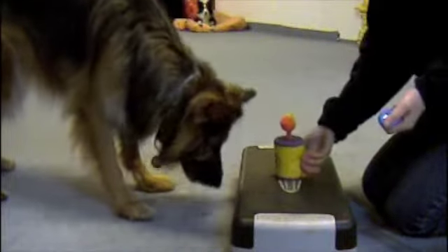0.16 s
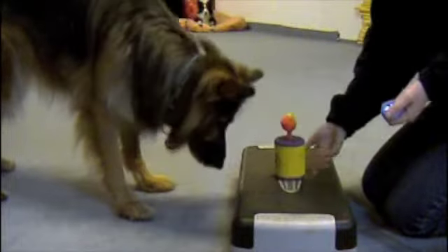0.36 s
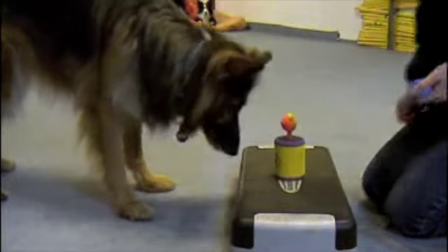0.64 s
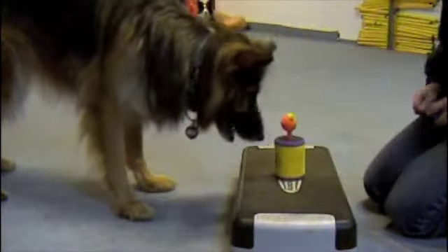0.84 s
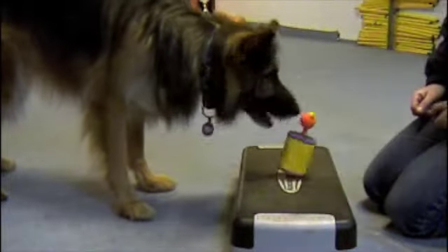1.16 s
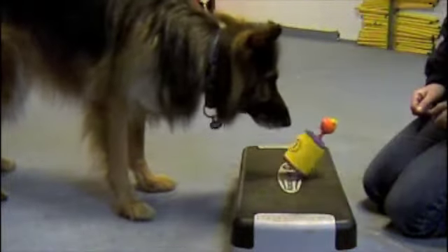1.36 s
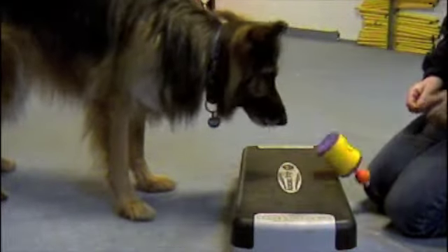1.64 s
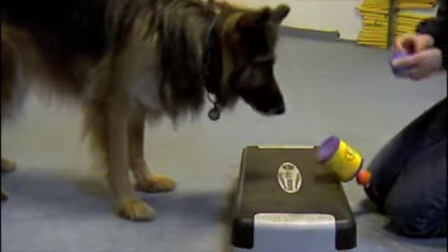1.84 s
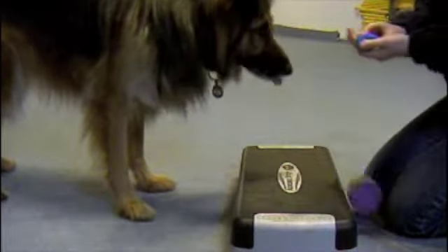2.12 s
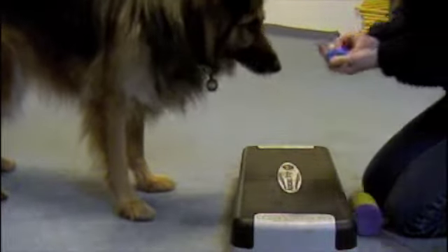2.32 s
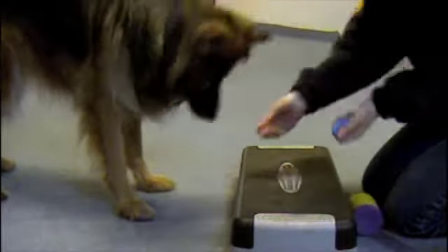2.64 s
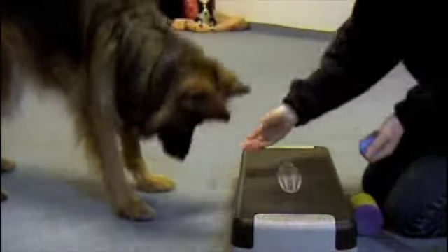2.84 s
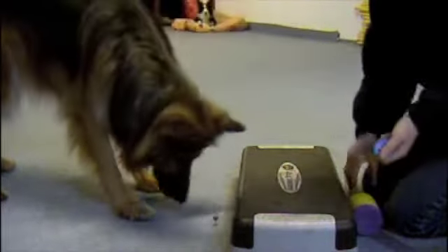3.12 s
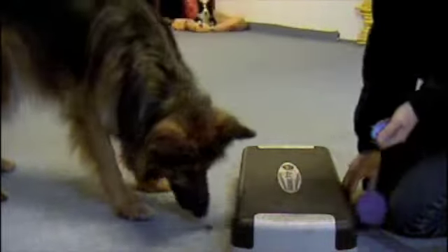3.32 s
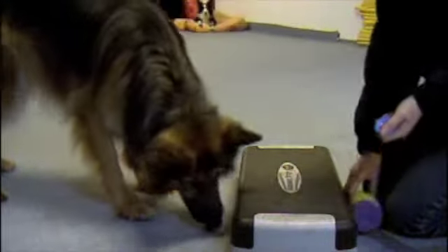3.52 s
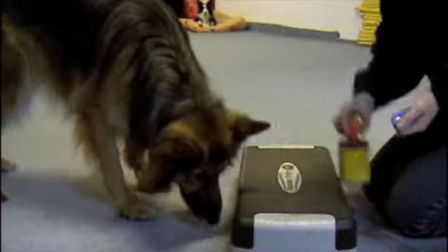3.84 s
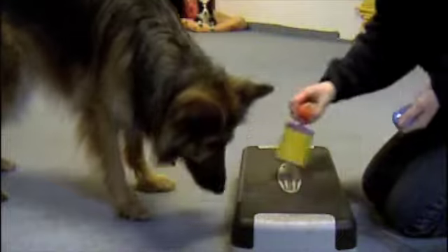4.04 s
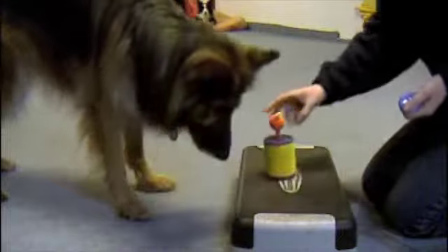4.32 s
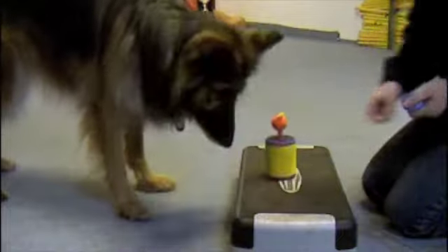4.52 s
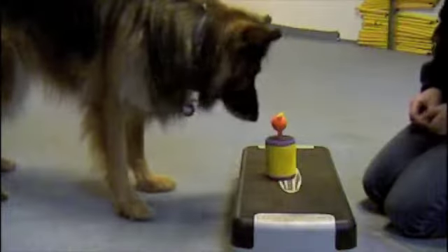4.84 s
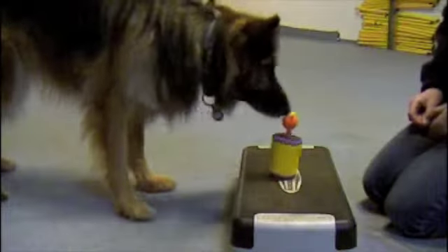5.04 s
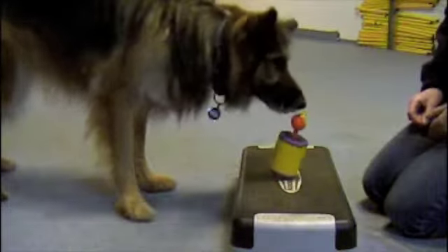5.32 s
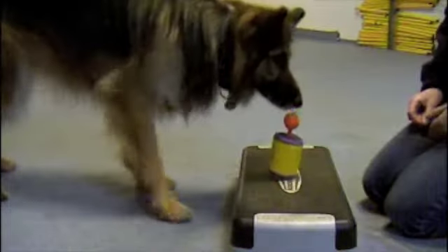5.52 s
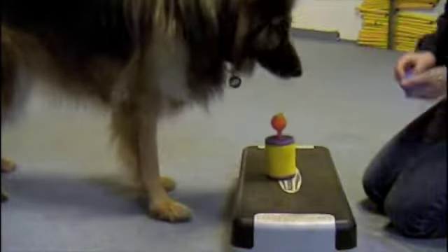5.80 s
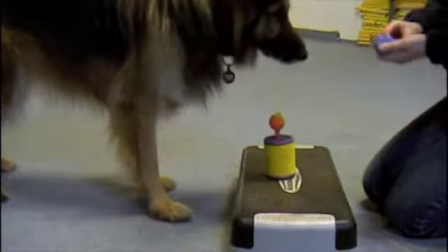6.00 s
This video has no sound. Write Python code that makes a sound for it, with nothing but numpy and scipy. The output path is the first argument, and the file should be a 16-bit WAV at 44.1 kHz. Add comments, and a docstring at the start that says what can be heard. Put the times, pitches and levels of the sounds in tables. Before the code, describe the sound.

A handheld training clicker snaps twice with sharp double clicks in a hall, amid a hollow thud, light plastic clacks and steady hiss.

```python
"""A handheld clicker snaps twice in a bare training hall: its steel tongue buckles, then springs back
at a lower pitch. Each click answers a dog, which nudges a plastic toy off an exercise step and later
touches it again. The hollow step thuds, the toy clacks; paws, hands and collar tick, cloth and fur rub.
A camcorder hisses and whines throughout, and overloads and ducks on every snap."""
import sys
import numpy as np
from scipy import signal
from scipy.fft import rfft, irfft
from scipy.io import wavfile

SR = 44100
rng = np.random.default_rng(int(sys.argv[2]) if len(sys.argv) > 2 else 0)


def inscribe(sig):
    """Save sig as 16-bit PCM at rate SR to the path in sys.argv[1].

    A 1-D sig is mono; a 2-D sig holds one channel per row.
    Samples are clipped to [-1, 1] before scaling.
    """
    pcm = np.round(np.clip(np.atleast_2d(sig).T, -1, 1) * 32767)
    wavfile.write(sys.argv[1], SR, pcm.astype(np.int16))


N = 271682
TIME_S = np.arange(N) / SR

# camcorder hiss spectrum: f/Hz, level/dB
HISS_COLOUR = [(24, -60), (40, -45), (144, -9.5), (269, -7), (297, 0), (337, -6.5), (392, -4), (630, -5),
               (873, -6.5), (965, -7), (2210, -11.5), (5580, -15.5), (6330, -25), (11000, -28),
               (14200, -36), (16000, -57)]
# hiss width: f/Hz, side over mid/dB
HISS_SIDE = [(60, 34.5), (150, 18), (380, 8), (950, 2), (2380, -5), (5980, 3.5), (15000, -4.5)]
# camcorder motor tones: f/Hz, level/dB
MOTOR_TONES = [(899.5, -63), (1500, -68), (1799, -69.5), (4500, -67.5), (4801, -72), (5100, -70.5),
               (5399, -68.5), (5700, -67.5)]
# movements of dog and handler: t/s, length/s, level/dB
MOVES = [(0, 1, -57.5), (0.807, 0.13, -54.5), (1.154, 0.24, -59), (2.15, 0.11, -59.5), (3.48, 0.6, -59.5),
         (4.236, 0.14, -56.5), (4.77, 0.089, -55), (5.578, 0.3, -56)]
# cloth and fur spectrum: f/Hz, level/dB
SHUFFLE_COLOUR = [(60, -9.5), (200, -9.5), (600, 1), (1500, 2), (3000, -4), (7000, -12.5), (15000, -37)]
# partials of a small tapped thing: ratio to pitch, level/dB
TAP_PARTIALS = [(.62, -14), (.9, -10.5), (1, -1), (1.42, -14.5), (2.3, -24)]
# soft knocks on and beside the step: t/s, level/dB, contact cutoff/Hz
KNOCKS = [(0.151, -6, 250), (1.119, -7, 220), (1.5959, 18, 616), (2.249, 9.5, 420), (3.58, -4, 615),
          (3.877, -13, 300), (4.19, 1, 520), (4.305, -8, 300), (6.048, -10.5, 253)]
# hollow step: f/Hz, width/Hz, level/dB
STEP_MODES = [(174, 30, 1.5), (221, 31.6, 11.5), (332, 12, 14.5), (361, 8.4, 5), (470, 57, -5),
              (700, 103, -1), (1150, 370, -2)]
# taps of treats, claws and fingers: t/s, level/dB, f/Hz
TAPS = [(0.196, -36, 1970), (0.491, -37, 4340), (0.543, -35.5, 2220), (0.559, -37, 2330),
        (0.832, -36, 4360), (0.838, -40, 1120), (1.321, -37.5, 2000), (2.225, -32, 5640),
        (3.28, -32.5, 662), (3.75, -42.5, 4020), (3.862, -32, 1940), (3.983, -36.5, 5200)]
# collar tag against its ring: t/s, level/dB
TAG_CLINKS = [(1.153, -40), (2.211, -35.5), (4.659, -30), (4.677, -33), (4.789, -32)]
# clicker pressed, let go: t/s, level/dB
PRESSES = [(1.4644, 37.5), (5.3649, 38)]
RELEASES = [(1.7097, 31.2), (5.6975, 31.55)]
# steel tongue in its plastic case, bent and relaxed: f/Hz, width/Hz, level/dB
BENT_MODES = [(1847, 850, -17.5), (2210, 550, -14), (2887, 250, -10.5), (3306, 110, -1.5),
              (3450, 354, -3.5), (4129, 124, 8), (4340, 380, -2.5), (4927, 148, -3), (5970, 300, -15.5),
              (6670, 87, -11), (7660, 470, -20.5), (10200, 570, -19), (11900, 690, -30)]
RELAXED_MODES = [(1826, 550, -15.5), (2350, 290, -10.5), (2905, 436, -5.5), (3475, 273, 4),
                 (3695, 140, 5.5), (4230, 415, -8), (4730, 450, -9), (5760, 414, -9), (9050, 100, -12),
                 (10530, 540, -21), (12500, 700, -35)]
# crack of the snapping tongue, on press and release: f/Hz, decay/s, level re snap/dB
CRACK_MODES = [(4850, 0.00032, -30.5), (12330, 0.0008, -41)]
# toy lands, is picked up, rocks to rest: t/s, level/dB
TOY_CLACKS = [(2.247, 1), (3.497, -7), (3.985, 0.5), (4.254, -1), (4.267, -1), (4.292, -2), (4.376, -4)]
# hollow toy: f/Hz, width/Hz, level/dB
TOY_MODES = [(750, 51, -0.5), (1454, 140, -1.5), (1700, 91, 0), (3440, 130, -12)]
# hall decay: f/Hz, T60/s
HALL_T60 = [(150, 0.6), (400, .48), (1500, 0.8141), (3600, 0.6273), (6000, 0.56), (10000, 0.31),
            (15000, 0.62)]
# hall tail spectrum: f/Hz, level/dB
HALL_COLOUR = [(150, 1.5), (1500, 2.5), (4000, -1.7), (8000, -3.5), (11000, -8), (15000, -4.5)]
# hall width: f/Hz, side over mid/dB
HALL_SIDE = [(150, 1), (500, -11), (1600, -16), (4000, -9), (7000, -3.5), (15000, 2.5)]
# early echoes: delay/s, level/dB
HALL_ECHOES = [(.0083, -22.5), (.0117, -15), (.0145, -14), (.0172, -19.5), (.0205, -14.5), (.0316, -39)]


def from_db(db):
    """Decibels to gain."""
    return 10 ** (np.asarray(db) / 20)


def at_hz(points, hz):
    """Table lookup on a log-frequency axis."""
    points_hz, values = np.transpose(points)
    return np.interp(np.log(np.maximum(hz, 1)), np.log(points_hz), values)


def cut(x, hz, kind, order=2):
    """Causal low- or high-pass."""
    return signal.sosfilt(signal.butter(order, min(hz, .45 * SR), kind, fs=SR, output="sos"), x)


def add(track, start_s, sound):
    """Mix a sound in at start_s."""
    at = int(round(start_s * SR))
    track[at:at + len(sound)] += sound[:max(N - at, 0)]


def impulse(length_s):
    """Unit blow, then silence."""
    return signal.unit_impulse(int(length_s * SR)) + 1e-18


def resonate(force, modes):
    """Parallel resonances of alternating sign."""
    out = 0
    for k, (hz, width_hz, db) in enumerate(modes):
        radius = np.exp(-np.pi * width_hz / SR)
        poles = [1, -2 * radius * np.cos(2 * np.pi * hz / SR), radius ** 2]
        ring = (1 - radius ** 2) / 2 * signal.lfilter([1, 0, -1], poles, force)
        out += (-1) ** k * from_db(db) * ring
    return out


def stereo_noise(colour, side_over_mid, size=N):
    """Coloured noise, width set by frequency; mid rms 1."""
    hz = np.fft.rfftfreq(size, 1 / SR)
    spectra = rfft(rng.standard_normal((2, size))) * from_db(at_hz(colour, hz))
    mid = irfft(spectra[0], size)
    side = irfft(spectra[1] * from_db(at_hz(side_over_mid, hz)), size)
    return np.array([mid + side, mid - side]) / mid.std()


def camcorder_noise(hiss_db=-53.97, waver_hz=3.9):
    """Steady hiss and the whine of a slightly wavering motor."""
    speed_error = 0.0257 * cut(rng.standard_normal(N), waver_hz, "low")
    clock_s = TIME_S + np.cumsum(speed_error) / SR
    whine = 0
    for hz, db in MOTOR_TONES:
        stereo_cycles = hz * clock_s + rng.random() + 0.13 * rng.random((2, 1))
        whine += np.sqrt(2) * from_db(db) * np.sin(2 * np.pi * stereo_cycles)
    return from_db(hiss_db) * stereo_noise(HISS_COLOUR, HISS_SIDE) + whine


def movement(attack_s=0.054, release_s=0.23, still_db=-63.5):
    """Motion of dog and handler as a gain: each move swells, holds, dies away."""
    gain = from_db(still_db)
    for start_s, length_s, db in MOVES:
        attack = np.clip(1 + (TIME_S - start_s) / attack_s, 0, 1)
        release = np.exp(-np.maximum(TIME_S - start_s - length_s, 0) / release_s)
        gain = np.maximum(gain, from_db(db) * attack * release)
    return gain


def shuffle(motion, grain_db=6.5):
    """Cloth and fur rub: noise that catches and slips."""
    slips = np.clip(rng.standard_normal(400), -1.5, 1.5)
    slip_db = grain_db * np.interp(TIME_S, np.linspace(0, TIME_S[-1], len(slips)), slips)
    return motion * from_db(slip_db) * stereo_noise(SHUFFLE_COLOUR, HALL_SIDE)


def tap(hz, crack_db, t60_s=None, ring_cycles=28, crack_s=0.0024):
    """Tiny crack plus damped partials; by default, smaller things ring shorter."""
    t = TIME_S[:SR // 10]
    t60_s = t60_s or ring_cycles / hz
    ring = 0
    for ratio, db in TAP_PARTIALS:
        partial_hz = min(hz * ratio * (1 + 0.03 * rng.standard_normal()), SR / 2)
        ring += from_db(db) * np.sin(2 * np.pi * partial_hz * t)
    burst = rng.standard_normal(len(t)) * np.exp(-t / crack_s)
    crack = from_db(crack_db) * cut(burst, 2 * hz, "low", order=1)
    sound = ring * from_db(-60 * t / t60_s) + crack
    sound = cut(sound, min(3.4 * hz, 9000), "low")   # finite contact time
    return cut(sound, 0.22 * hz, "high")   # small things radiate no bass


def ticks(motion, rate_per_s=14, over_motion_db=13.5, spread_db=3.5, centre_hz=2760, spread_oct=0.74):
    """Faint random taps, scaled by the motion that causes them."""
    out = np.zeros(N)
    for at in np.flatnonzero(rng.random(N) < rate_per_s / SR):
        softness, pitch = np.clip(rng.standard_normal(2), -2, 2)
        hz = centre_hz * 2 ** (spread_oct * pitch)
        gain = motion[at] * from_db(over_motion_db - spread_db * softness)
        add(out, at / SR, gain * tap(hz, crack_db=-12))
    return out


def step_knocks(thud_db=2, thud_low_hz=210, thud_high_hz=370):
    """Padded blows on the step; softer ones wake only its lowest modes."""
    force = np.full(N, 1e-18)
    for start_s, db, cutoff_hz in KNOCKS:
        add(force, start_s, from_db(db) * cut(impulse(.03), cutoff_hz, "low"))
    thud = cut(cut(force, thud_low_hz, "high"), thud_high_hz, "low")   # deck gives before it rings
    return cut(resonate(force, STEP_MODES) + from_db(thud_db) * thud, 140, "high")


def taps():
    """Treats, claws and fingers tap, each at its own pitch."""
    out = np.zeros(N)
    for start_s, db, hz in TAPS:
        add(out, start_s, from_db(db) * tap(hz, crack_db=-1))
    return out


def collar_tag(hz=3480, t60_s=0.0089):
    """The tag swings against its ring and clinks at one pitch."""
    out = np.zeros(N)
    for start_s, db in TAG_CLINKS:
        add(out, start_s, from_db(db) * tap(hz, crack_db=-3.5, t60_s=t60_s))
    return out


def clicker_snaps(events, modes, rebound_s, highpass_hz, rebound_db=-14.5):
    """The tongue buckles, then hits its stop; the small case radiates no bass."""
    out = np.zeros(N)
    ring = cut(resonate(impulse(0.084), modes), highpass_hz, "high", order=4)
    for start_s, db in events:
        add(out, start_s, from_db(db) * ring)
        add(out, start_s + rebound_s, from_db(db + rebound_db) * ring)
    return out


def clicker_cracks():
    """Instant of each snap, press and release: a steep swing and brief zing, beamed forward, so no reverb."""
    out, t = np.zeros(N), TIME_S[:SR // 100]
    crack = 0
    for hz, decay_s, db in CRACK_MODES:
        crack += from_db(db) * np.sin(2 * np.pi * hz * t) * np.exp(-t / decay_s)
    for start_s, db in PRESSES + RELEASES:
        add(out, start_s, from_db(db) * crack)
    return out


def toy_clacks(crack_db=-27, crack_cutoff_hz=4500):
    """Hard contacts crack on the toy's shell and set it ringing."""
    force = np.full(N, 1e-18)
    for start_s, db in TOY_CLACKS:
        add(force, start_s, from_db(db) * impulse(.01))
    return resonate(force, TOY_MODES) + from_db(crack_db) * cut(force, crack_cutoff_hz, "low")


def hall_response(tail_db=-34, predelay_s=0.0025, build_up_s=0.0058):
    """Early echoes and a diffuse tail, longest in the midrange."""
    t, hz = TIME_S[:SR], np.fft.rfftfreq(SR, 1 / SR)
    spectrum = rfft(stereo_noise(HALL_COLOUR, HALL_SIDE, size=SR))
    centres_hz = np.geomspace(100, 16000, 12)
    tail = 0
    for centre_hz, weights in zip(centres_hz, np.eye(len(centres_hz))):
        band = irfft(spectrum * at_hz(np.c_[centres_hz, weights], hz), SR)
        tail += band * from_db(-60 * t / at_hz(HALL_T60, centre_hz))
    response = from_db(tail_db) * tail * np.clip((t - predelay_s) / build_up_s, 0, 1)
    for k, (delay_s, db) in enumerate(HALL_ECHOES):
        at, near_side = int(delay_s * SR), k % 2
        response[near_side, at] += from_db(db)
        response[1 - near_side, at + 1] += from_db(db)
    return response


def in_hall(x, hall, wet_db, pan_db):
    """Direct sound plus reverb; pan_db is left over right."""
    wet = signal.fftconvolve(x[None], hall, axes=1)[:, :N]
    return (x + from_db(wet_db) * wet) * from_db([[pan_db / 2], [-pan_db / 2]])


def scene():
    """Clicker, step and small noises in one hall, over shuffle, hiss and whine."""
    hall, motion = hall_response(), movement()
    background = (shuffle(motion) + camcorder_noise()) * from_db([[-0.5], [0.5]])
    press = clicker_snaps(PRESSES, BENT_MODES, rebound_s=0.001302, highpass_hz=1310)
    release = clicker_snaps(RELEASES, RELAXED_MODES, rebound_s=0.001485, highpass_hz=1510)
    clicker = in_hall(press, hall, wet_db=2, pan_db=-0.5) + in_hall(release, hall, wet_db=1, pan_db=-1.1)
    step = in_hall(step_knocks(), hall, wet_db=-5, pan_db=-4.5)
    contacts = taps() + collar_tag() + toy_clacks() + ticks(motion)
    small_things = in_hall(contacts, hall, wet_db=-3, pan_db=-2)
    return clicker + clicker_cracks() + step + small_things + background


def ducking_db(x, threshold_db=-12, max_cut_db=9, recovery_db_per_s=23, attack_hz=350):
    """Gain control: loud peaks turn the input down; recovery is slow."""
    peak_db = 20 * np.log10(np.abs(x).max(axis=0) + 1e-9)
    over_db = np.clip(peak_db - threshold_db, 0, max_cut_db)
    recovery_db = recovery_db_per_s * TIME_S
    held_db = np.maximum.accumulate(over_db + recovery_db) - recovery_db
    return cut(held_db, attack_hz, "low", order=1)


def overload_thump(x, threshold=0.39, leak_s=0.05, coupling_hz=0.41, lowpass_hz=780):
    """Overload charges the input stage; the charge leaks away as a low thump."""
    excess = np.maximum(np.abs(x).max(axis=0) - threshold, 1e-9)
    leak = TIME_S / leak_s
    charge = np.exp(np.maximum.accumulate(np.log(excess) + leak) - leak)
    return cut(cut(charge, coupling_hz, "high", order=1), lowpass_hz, "low", order=1)


def record(dry, ceiling=0.88, stopband_hz=16800):
    """Camcorder input: duck, soft-clip, thump, low-pass."""
    ducked = dry * from_db(-ducking_db(dry))
    clipped = ducked / (1 + (ducked / ceiling) ** 4) ** (1 / 4)
    thump = from_db([[-18.5], [-16]]) * overload_thump(clipped)
    lowpass = signal.cheby2(14, 60, stopband_hz, fs=SR, output="sos")
    return signal.sosfilt(lowpass, clipped + thump)


dry = scene()
out = record(dry)
inscribe(out)
```